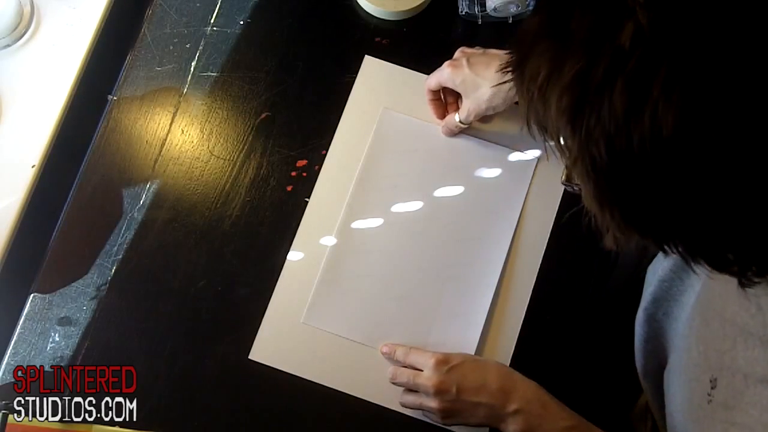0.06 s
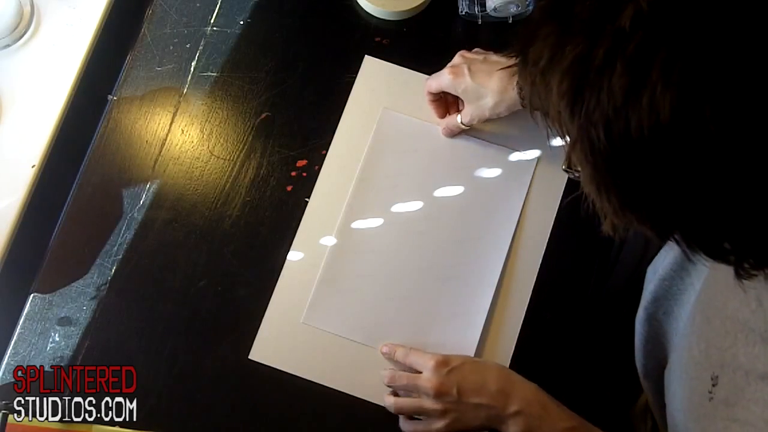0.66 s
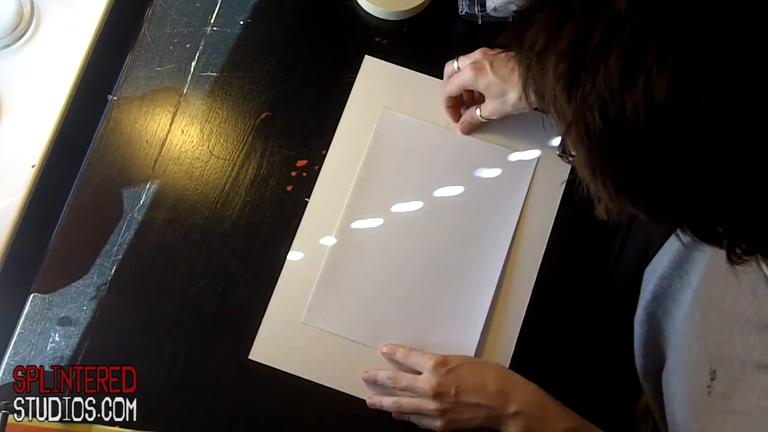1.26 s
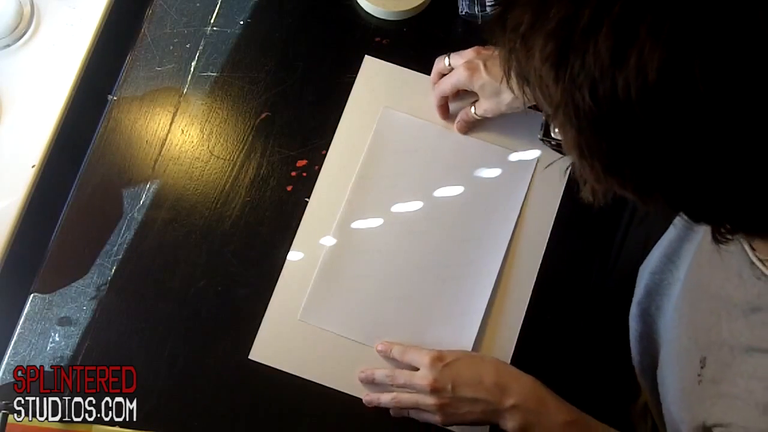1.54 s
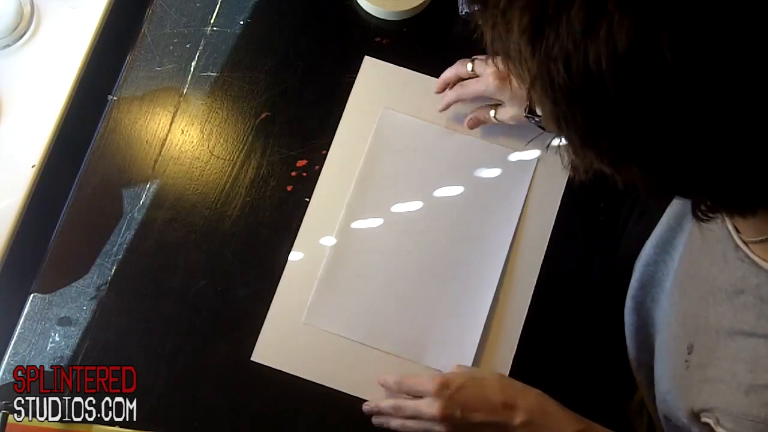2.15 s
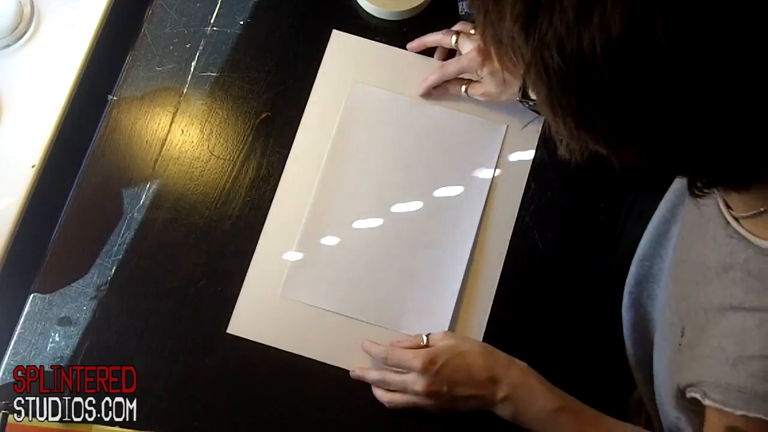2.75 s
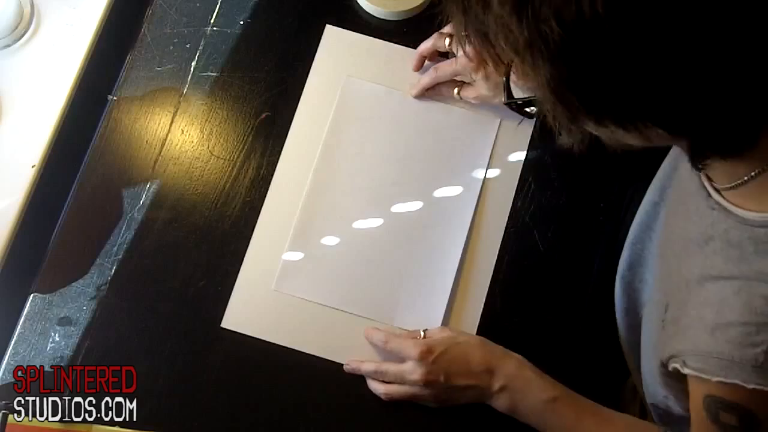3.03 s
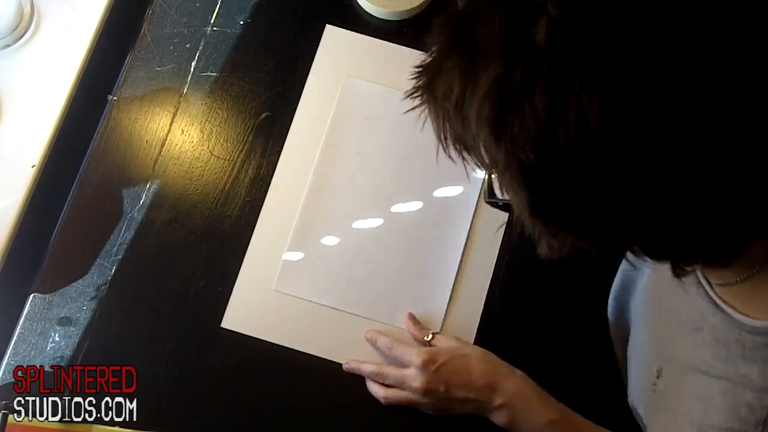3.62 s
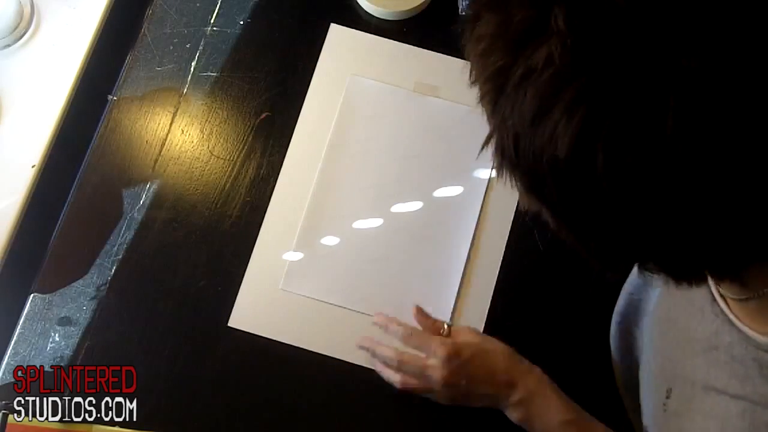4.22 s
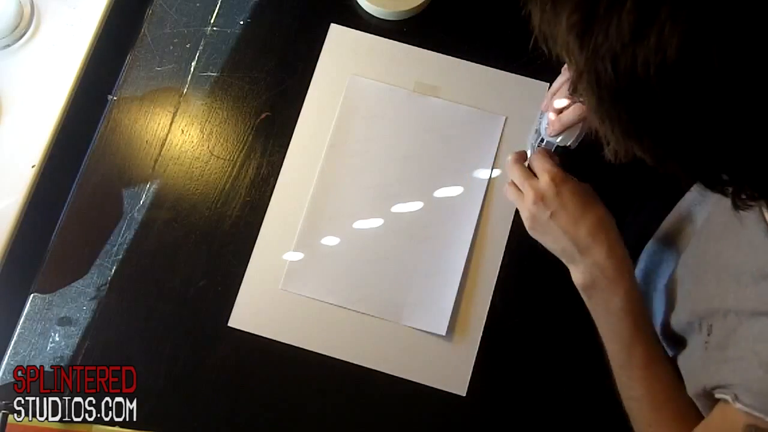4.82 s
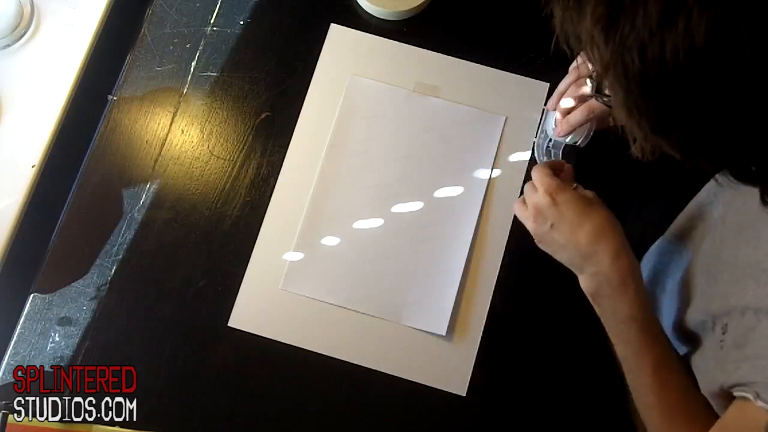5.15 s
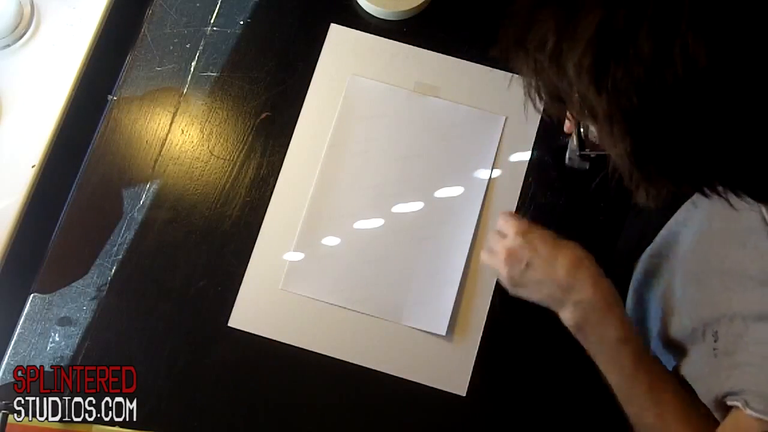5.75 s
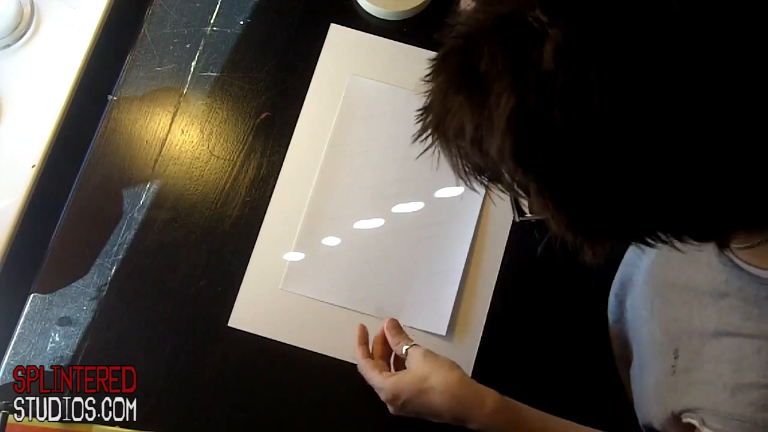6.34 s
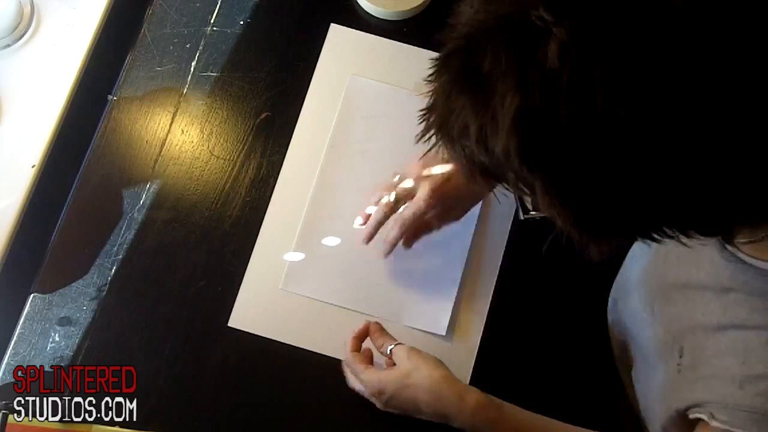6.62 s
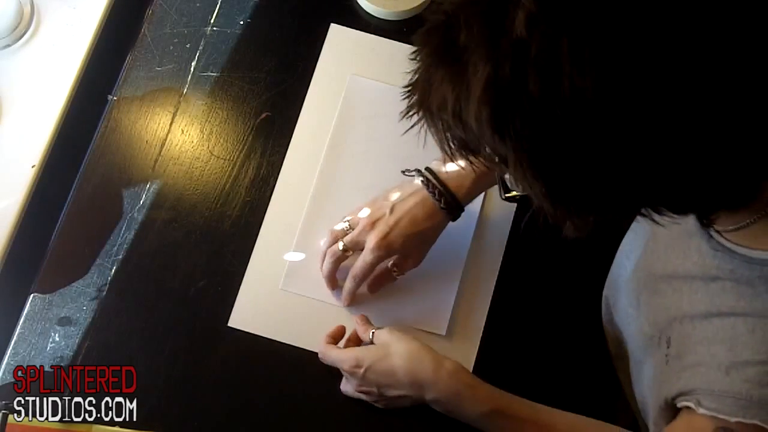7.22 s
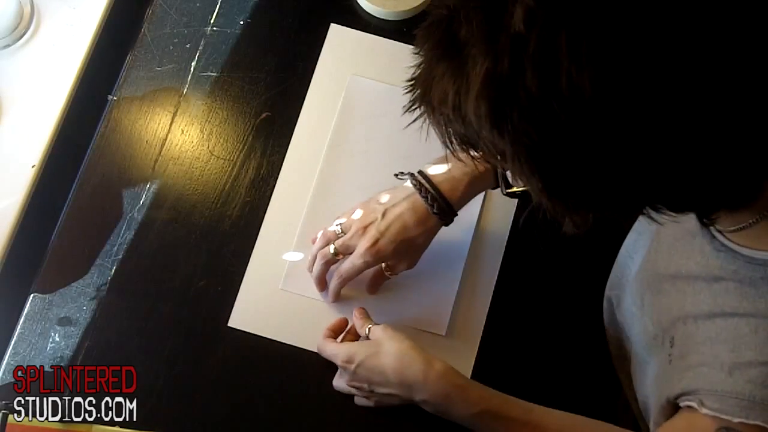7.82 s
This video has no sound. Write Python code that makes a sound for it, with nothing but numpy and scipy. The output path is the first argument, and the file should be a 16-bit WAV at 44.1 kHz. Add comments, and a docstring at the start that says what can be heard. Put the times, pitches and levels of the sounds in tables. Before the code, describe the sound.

Fingers rub paper, then sticky tape squeaks off a roll and a plastic dispenser clacks down on a desk, over a faint fan hum.

```python
"""A fan hums in a small room while fingers rub a sheet of paper that is being taped to a card on a desk.
Skin catches on the fibres with a soft hiss, and paper and tape crackle as they bend. After about four
seconds, tape squeaks off its roll in short jerks as the glue sticks and slips, then rips on the cutter.
The plastic dispenser is put down with two sharp clacks, the new strip crackles in the hand,
and a forearm brushes across the card."""
import sys
import numpy as np
from scipy import signal
from scipy.fft import rfft, irfft, next_fast_len
from scipy.io import wavfile
from scipy.ndimage import uniform_filter1d, map_coordinates

SR = 44100
rng = np.random.default_rng(int(sys.argv[2]) if len(sys.argv) > 2 else 0)


def inscribe(sig):
    """Save sig as 16-bit PCM at rate SR to the path in sys.argv[1].

    A 1-D sig is mono; a 2-D sig holds one channel per row.
    Samples are clipped to [-1, 1] before scaling.
    """
    pcm = np.round(np.clip(np.atleast_2d(sig).T, -1, 1) * 32767)
    wavfile.write(sys.argv[1], SR, pcm.astype(np.int16))


N = 356592
TIME = np.arange(N) / SR
SHOT = TIME[:SR // 2]  # time within one short sound

# tone of the fan's rushing air: pitch_hz, level_db
AIR_COLOUR = [(20, -29), (36, -10), (52, -0.5), (75, -4), (100, -9.5), (150, -3.5), (200, 0), (320, -1.5),
              (400, -3.5), (720, -3.5), (1000, 0), (1350, -3.5), (2000, -11.5), (3000, -16.5),
              (11000, -22.5)]
# the fan's hum notes: pitch_hz, level_db, width_hz
HUM_NOTES = [(119.7, -61.5, 0.22), (203.8, -63, 1.66), (231, -69.5, 12), (281.5, -62.5, 2.9)]
# finger strokes over paper and tape: start_s, length_s, level_db, relative_treble_db
STROKES = [(0.62, 0.28, -55.5, -0.5), (0.88, 0.095, -56.5, -7), (1.3, 0.59, -59.5, -1.5),
           (2.174, 0.12, -59, -3.5), (2.422, 0.063, -48.5, -9), (2.451, 0.26, -46, -10.5),
           (2.9, 0.13, -55.5, -9), (3.569, 0.038, -57, -5), (3.62, 0.5, -63.5, -1.5),
           (3.961, 0.14, -56, -9), (4.152, 0.077, -56.5, -3), (4.85, 0.18, -60, -8),
           (5.202, 0.14, -54.5, -3), (5.67, 0.052, -55, -13), (6.102, 0.09, -51, -4),
           (6.67, 0.19, -56, -6.5), (6.962, 0.11, -60, -8), (7.046, 0.075, -51.5, -2)]
# tone of skin rubbing on paper: pitch_hz, level_db
RUB_COLOUR = [(500, -10.5), (1500, -4), (3000, -7), (4800, -0.5), (6200, -2.5), (8000, -12.5), (12000, -31)]
# tone of the fibres' high hiss: pitch_hz, level_db
FIBRE_COLOUR = [(3000, -29), (5500, -10.5), (7200, -1.5), (9500, -2), (12000, -9.5)]
# crackles of tape and paper: start_s, level_db, body_db, treble_db, sheet_pitch_hz
CRACKLES = [(0.2313, -37, -22, -3, 5000), (0.7148, -39.5, -3, 16, 6470), (0.9568, -21.5, -12.5, 1.5, 6480),
            (0.97, -29, 17.5, 16.5, 7740), (3.4332, -46, 14, -6, 4290), (4.8235, -45.5, 5, -11, 4180),
            (4.9607, -36, 7, -1, 3900), (5.01, -42.5, 9, 1, 5840), (6.0263, -36, -7, -1, 7900),
            (6.098, -40.5, -2, -4, 5660), (6.1367, -32.5, -7, -3, 3400), (6.7818, -35.5, -1, 4.5, 3530),
            (7.1025, -28.5, -8, -9.5, 4250)]
# the arm shifting its weight on the desk: start_s, length_s, level_db
LEANS = [(1.6, 0.12, -61), (3.901, 0.25, -64)]
# faint squeaks under the fingertips: start_s, length_s, pitch_hz, level_db
SQUEAKS = [(2.63, 0.24, 3340, -67), (3.656, 0.1, 4490, -63), (3.764, .16, 4530, -72)]
# jerks of tape off the roll: start_s, length_s, level_db, slips_per_s, jitter, treble_db, favoured_hz
PEELS = [(4.472, 0.023, -28.5, 476, 0.19, -7, 1455), (4.488, 0.03, -20.5, 455, 0.04, 0, 3200),
         (4.4995, 0.0099, -18, 2100, 0.03, 4, 2090), (4.686, 0.027, -35, 1070, 0.29, -34, 3200),
         (5.072, 0.014, -32.5, 700, 0.3, -10, 1455), (5.08, 0.0177, -26.5, 930, 0.02, 1, 1055),
         (5.098, 0.0082, -19.5, 2110, 0.17, 8, 2090)]
# tone of peeling tape: pitch_hz, level_db
PEEL_COLOUR = [(150, -15), (430, -3.5), (700, 0), (950, -3.5), (1400, -2.5), (2100, -0.5), (2600, -12),
               (3250, -0.5), (4200, -3.5), (7000, -9.5), (12000, -19)]
# notes the dispenser's plastic shell rings at: pitch_hz, width_hz, level_db
SHELL_NOTES = [(450, 8.7, -3), (1055, 43, 5.5), (1230, 74, 2), (1455, 90, 5.5), (2090, 92, 6.5),
               (2580, 90, 0), (2884, 100, 1), (3200, 130, -1), (4130, 350, -4), (4850, 600, -10)]
# snaps and clacks of the dispenser:
# start_s, level_db, bass_db, middle_db, treble_db, ring_db, favoured_hz, thud_db
CLACKS = [(4.495, -28, -15, -20, -16, -12, 4130, -40), (4.4974, -22.5, -1, 5, -16, -10, 450, -22),
          (4.6870, -33, -5, -5, 5, 7, 3200, -36), (4.896, -35, -12.5, 0.5, 0, 8, 2090, -42),
          (5.0685, -23, -3, 10, 5, 0, 1455, -40), (5.0782, -14.5, -25, 9, -1.5, -11.5, 1455, -40),
          (5.2095, -31, -11, 3.5, -5.5, -1, 1455, -44), (5.3753, -21, -7.5, -3.5, 0, 0.5, 1230, -37),
          (5.380, -35, -2, -3, -27, -7, 1455, -36), (5.8277, -10.5, -8, -1.5, 0.5, -1.5, 4850, -49),
          (6.196, -5.5, -4, -1, -7, -12.5, 2090, -10), (6.5814, -2.5, -11.5, -4, -2.5, 1, 1055, -45)]
# low notes the desk top rings at: pitch_hz, width_hz, level_db
DESK_NOTES = [(94.4, 17, -1.5), (207, 29, -7), (348, 40, -3.5), (504, 150, -2.5)]
# the dispenser sliding on the desk: start_s, length_s, level_db, bass_db, ring_db, favoured_hz
SLIDES = [(4.936, 0.0096, -45, -6, 19, 1455), (6.323, 0.031, -34.5, 4.5, -15, 450),
          (6.515, 0.018, -35.5, 1.5, -1, 1455), (6.527, 0.047, -34.5, -7, -6, 1455)]
# tone of plastic scuffing the desk: pitch_hz, level_db
SLIDE_COLOUR = [(100, -23), (450, -2.5), (800, -9.5), (1500, 3.5), (2200, -0.5), (3000, -6), (4200, -4),
                (7000, -20), (12000, -33)]
# tape stretching over the cutter's teeth: time_s, level_db, rips_per_s
RIP_CURVE = [(5.326, -77, 600), (5.345, -38, 830), (5.358, -33.5, 1200), (5.371, -31, 4000),
             (5.377, -23.5, 2660), (5.386, -31, 1900), (5.396, -70, 730)]
# tone of ripping tape: pitch_hz, level_db
RIP_COLOUR = [(300, -10.5), (1300, -4), (3000, -6.5), (4800, 8.5), (8000, 4), (12000, -4)]
# the forearm brushing across the card: time_s, level_db
BRUSH_CURVE = [(6.85, -65), (7.1, -55.5), (7.26, -50.5), (7.38, -57.5), (7.55, -66)]
# tone of the forearm's swish: pitch_hz, level_db
BRUSH_COLOUR = [(400, -26), (850, -8), (1100, 6), (1400, 4.5), (2000, -11.5), (4000, -33)]
# how long the room's late echo takes to fall by 60 dB: pitch_hz, decay_s
ROOM_DECAY = [(100, 0.36), (200, 0.93), (530, 0.29), (1390, 0.29), (3680, 0.26), (9700, 0.21)]


def from_db(db):
    """Turn decibels into a number to multiply by."""
    return 10 ** (np.asarray(db) / 20)


def rms_one(x):
    """Scale a sound so that its average strength (rms) is one."""
    return x / np.sqrt(np.mean(x ** 2) + 1e-20)


def with_energy(x, seconds):
    """Give a sound as much energy as one of strength one lasting so many seconds."""
    return rms_one(x) * np.sqrt(seconds * SR / len(x))


def in_time(rows):
    """Join a table's points with straight lines, giving each column a value at every sample."""
    times, *columns = np.transpose(rows)
    return [np.interp(TIME, times, column) for column in columns]


def at_hz(points, hz):
    """Read between a table's pitches, with octaves evenly spaced."""
    pitches, values = np.transpose(points)
    return np.interp(np.log(np.maximum(hz, 1)), np.log(pitches), values)


def colour(x, points):
    """Turn pitches up or down by (pitch_hz, level_db) points."""
    size = 2 * next_fast_len(len(x))
    gains = from_db(at_hz(points, np.fft.rfftfreq(size, 1 / SR)))
    cepstrum = irfft(np.log(gains))
    # fold the filter forward in time, so nothing sounds before its cause
    cepstrum[1:size // 2] *= 2
    cepstrum[size // 2 + 1:] = 0
    return irfft(rfft(x, size) * np.exp(rfft(cepstrum)))[:len(x)]


def add(out, start_s, sound):
    """Mix a sound in at its start time."""
    i = round(start_s * SR)
    out[i:i + len(sound)] += sound[:N - i]


def resonate(x, hz, width_hz):
    """Make a sound ring at one pitch; a narrower width rings longer."""
    r = np.exp(-np.pi * width_hz / SR)
    feedback = [1, -2 * r * np.cos(2 * np.pi * hz / SR), r * r]
    return signal.lfilter(np.array([1, 0, -1]) * (1 - r * r) / 2, feedback, x + 1e-18)


def drift(per_s):
    """A smooth wander through so many random values a second."""
    knots = rng.standard_normal(400)
    return rms_one(map_coordinates(knots, [TIME * per_s], order=3, mode="wrap"))


def grains(per_s, spread_db):
    """Random clicks of uneven size."""
    sizes = from_db(spread_db * np.minimum(rng.exponential(1, N), 4))
    signs = rng.choice([-1, 1], N)
    happens = rng.random(N) < per_s / SR
    return rms_one(sizes * signs * happens / np.sqrt(per_s))


def crack(length_s):
    """A tight cluster of tiny breaks, about equally strong at all pitches."""
    fade = np.exp(-(SHOT / length_s) ** 2)
    spectrum = rfft(rng.standard_normal(len(SHOT)) * fade)
    return irfft(spectrum / (np.abs(spectrum) + 1e-12), len(SHOT)) * np.sqrt(fade)


def swell(length_s):
    """A rounded rise and fall in loudness."""
    arch = np.sin(np.pi * np.minimum(SHOT / length_s, 1))
    return np.sqrt(np.maximum(arch, 0))


def fan(air_db=-52.5):
    """The fan gives a steady rush of air and a few wavering hum notes."""
    air = from_db(air_db) * rms_one(colour(rng.standard_normal(N), AIR_COLOUR))
    hum = 0
    for hz, db, width_hz in HUM_NOTES:
        wander = np.cumsum(rng.standard_normal(N)) * np.sqrt(2 * np.pi * width_hz / SR)
        note = np.sin(2 * np.pi * hz * TIME + wander)
        hum += from_db(db) * rms_one(resonate(note, hz, width_hz=39))
    return air + hum


def finger_speed(start_s, length_s, rise_share=0.24, fall_share=0.46):
    """A finger speeds up from 0 to 1, glides, and slows to rest."""
    progress = (TIME - start_s) / length_s
    return np.clip(np.minimum(progress / rise_share, (1 - progress) / fall_share), 0, 1)


def rubbing(resting_db=-70, fidget_db=2, resting_treble_db=-6):
    """Skin catches on paper fibres, louder as the finger speeds up; resting hands rustle faintly."""
    level = from_db(resting_db + fidget_db * drift(per_s=6))
    treble = level * from_db(resting_treble_db)
    for start_s, length_s, db, treble_db in STROKES:
        friction = from_db(db) * finger_speed(start_s, length_s)
        level = np.hypot(level, friction)
        treble = np.hypot(treble, friction * from_db(treble_db))
    fingers = level * rms_one(colour(grains(per_s=5000, spread_db=3.5), RUB_COLOUR))
    fibres = treble * rms_one(colour(grains(per_s=3000, spread_db=3.5), FIBRE_COLOUR))
    return fingers + fibres


def crackles(flutter_db=-1, sheet_db=-1):
    """Tape and paper buckle or come unstuck with a dry tick, and the sheet flutters briefly."""
    out = np.zeros(N)
    for start_s, db, body, treble, hz in CRACKLES:
        flutter = from_db(flutter_db) * rms_one(crack(length_s=0.016))
        tick = rms_one(crack(length_s=0.00145))
        tone = [(150, body - 17.5), (500, body - 8), (1900, body), (3900, 0),
                (5600, treble), (9000, treble), (12000, treble - 1)]
        buckle = colour(tick + flutter, tone)
        sheet = from_db(sheet_db) * resonate(buckle, hz, width_hz=2100)
        add(out, start_s, from_db(db) * with_energy(buckle + sheet, seconds=0.0033))
    return out


def narrow_noise(hz, width_hz):
    """Noise rung twice at one pitch, leaving an unsteady tone."""
    noise = rng.standard_normal(len(SHOT))
    return resonate(resonate(noise, hz, width_hz), hz, width_hz)


def leaning():
    """The desk gives a soft low rumble under the shifting arm."""
    out = np.zeros(N)
    for start_s, length_s, db in LEANS:
        rumble = narrow_noise(hz=62, width_hz=30) * swell(length_s)
        add(out, start_s, from_db(db) * with_energy(rumble, length_s))
    return out


def squeaks():
    """A fingertip judders on smooth tape with a thin, wavering tone."""
    out = np.zeros(N)
    for start_s, length_s, hz, db in SQUEAKS:
        tone = rms_one(narrow_noise(hz, width_hz=200))
        add(out, start_s, from_db(db) * tone * swell(length_s))
    return out


def dispenser(force, ring_db, favoured_hz, boost_db=8):
    """A touch is heard along with the shell's ring; the spot touched favours one note."""
    ring = 0
    for hz, width_hz, db in SHELL_NOTES:
        nearness = np.exp(-(10 * np.log(hz / favoured_hz)) ** 2)
        ring += from_db(db + boost_db * nearness) * resonate(force, hz, width_hz)
    return force + from_db(ring_db) * ring


def peels(hiss_db=-7, spread_db=3.1):
    """The glue sticks and slips hundreds of times a second or more; each slip kicks the dispenser."""
    out = np.zeros(N)
    for start_s, length_s, db, slips_per_s, jitter, treble, favoured_hz in PEELS:
        gaps, sizes = rng.standard_normal((2, 120))
        slip_times = np.cumsum(np.exp(jitter * gaps)) / slips_per_s
        slip_samples = np.round(slip_times * SR).astype(int)
        kicks = np.bincount(slip_samples, from_db(spread_db * sizes), len(SHOT))[:len(SHOT)]
        # each slip runs across the width of the tape, which smears it in time
        smear = with_energy(crack(length_s=0.001), 1 / slips_per_s)
        slips = signal.fftconvolve(kicks, smear)[:len(SHOT)]
        hiss = from_db(hiss_db) * rng.standard_normal(len(SHOT))
        force = colour((slips + hiss) * swell(length_s), PEEL_COLOUR)
        force = colour(force, [(30, -13.5), (200, -5.5), (3500, -1), (9000, treble)])
        sound = dispenser(force, ring_db=-3, favoured_hz=favoured_hz)
        add(out, start_s, from_db(db) * with_energy(sound, length_s))
    return out


def clacks(contact_s=0.0032):
    """Tape snaps on the cutter and the shell hits the desk, whose top answers with a thud."""
    out = np.zeros(N)
    tap = SHOT == 0
    desk = sum(from_db(db) * resonate(tap, hz, width_hz) for hz, width_hz, db in DESK_NOTES)
    thud = with_energy(desk, seconds=0.00017)
    for start_s, db, bass, middle, treble, ring_db, favoured_hz, thud_db in CLACKS:
        tone = [(30, bass - 28), (120, bass - 14), (450, bass), (750, bass - 1), (1400, middle),
                (2800, -2), (4300, 0.6), (8000, treble), (12000, treble - 8)]
        force = colour(crack(contact_s), tone)
        shell = with_energy(dispenser(force, ring_db, favoured_hz), seconds=0.0016)
        add(out, start_s, from_db(db) * (shell + from_db(thud_db) * thud))
    return out


def slides():
    """The shell scuffs over the desk before it settles."""
    out = np.zeros(N)
    for start_s, length_s, db, bass, ring_db, favoured_hz in SLIDES:
        scuff = colour(rng.standard_normal(len(SHOT)) * swell(length_s), SLIDE_COLOUR)
        force = colour(scuff, [(500, bass), (1200, 0)])
        sound = dispenser(force, ring_db, favoured_hz)
        add(out, start_s, from_db(db) * with_energy(sound, length_s))
    return out


def rip():
    """The stretched tape gives way in tiny rips that speed up, then die away."""
    db, rips_per_s = in_time(RIP_CURVE)
    tearing = (TIME > RIP_CURVE[0][0]) & (TIME < RIP_CURVE[-1][0])
    film = grains(rips_per_s, spread_db=4.5) + 0.5 * rng.standard_normal(N)
    return from_db(db) * tearing * rms_one(colour(film, RIP_COLOUR))


def forearm():
    """The forearm brushes across the card with a dull swish."""
    db, = in_time(BRUSH_CURVE)
    touching = TIME > BRUSH_CURVE[0][0]
    return from_db(db) * touching * rms_one(colour(rng.standard_normal(N), BRUSH_COLOUR))


def late_echo():
    """The room's lingering sound: bands of noise that each die away at their own rate."""
    out = 0
    edges_hz = np.geomspace(50, 16000, 26)
    noises = rng.standard_normal((2, len(SHOT)))
    hz = np.fft.rfftfreq(len(SHOT), 1 / SR)
    for k, (low, high) in enumerate(zip(edges_hz, edges_hz[1:])):
        decay_s = at_hz(ROOM_DECAY, np.sqrt(low * high))
        band = irfft(rfft(noises[k % 2]) * ((hz >= low) & (hz < high)), len(SHOT))
        fade = np.exp(-np.log(1000) * SHOT / decay_s)
        out += with_energy(band * fade, decay_s * (high - low))
    return out / np.linalg.norm(out)


def even_out(x, smooth_hz=70):
    """Give a short sound about the same power at all pitches."""
    spectrum = rfft(x)
    bins = max(1, round(smooth_hz * len(x) / SR))
    power = uniform_filter1d(np.abs(spectrum) ** 2, bins)
    return irfft(spectrum / np.sqrt(power), len(x))


def room_echo(early_decay_s=0.14, late_db=-5, build_s=0.002):
    """Sound bounces off the desk and near walls first; the rest of the room follows."""
    early = rng.standard_normal(len(SHOT)) * np.exp(-np.log(1000) * SHOT / early_decay_s)
    echo = even_out(early / np.linalg.norm(early) + from_db(late_db) * late_echo())
    echo *= np.minimum(SHOT / build_s, 1) ** 2  # builds up quickly
    echo *= (1 - SHOT / SHOT[-1]) ** 2  # gone within half a second
    return echo / np.linalg.norm(echo)


def scene(shell_echo_db=1.5, tape_echo_db=-3, crackle_echo_db=1, rub_echo_db=-2):
    """Hands, tape and dispenser each echo from their own spot; the fan runs behind."""
    sources = [(clacks(), shell_echo_db), (slides(), shell_echo_db), (peels() + rip(), tape_echo_db),
               (crackles(), crackle_echo_db), (rubbing() + forearm() + squeaks(), rub_echo_db)]
    out = fan() + leaning()
    for sound, echo_db in sources:
        out += sound + from_db(echo_db) * signal.fftconvolve(sound, room_echo())[:N]
    return out[None]


def record(dry, ceiling=0.88, cutoff_hz=11900):
    """The loudest clacks overload and are squashed; the highest treble is cut."""
    squashed = dry / (1 + (dry / ceiling) ** 6) ** (1 / 6)
    treble_cut = signal.ellip(10, 0.2, 70, cutoff_hz, fs=SR, output="sos")
    return signal.sosfilt(treble_cut, squashed)


dry = scene()
out = record(dry)
inscribe(out)
```